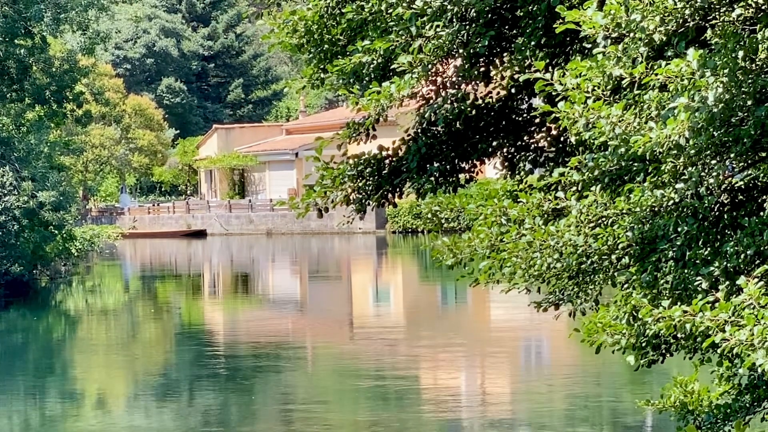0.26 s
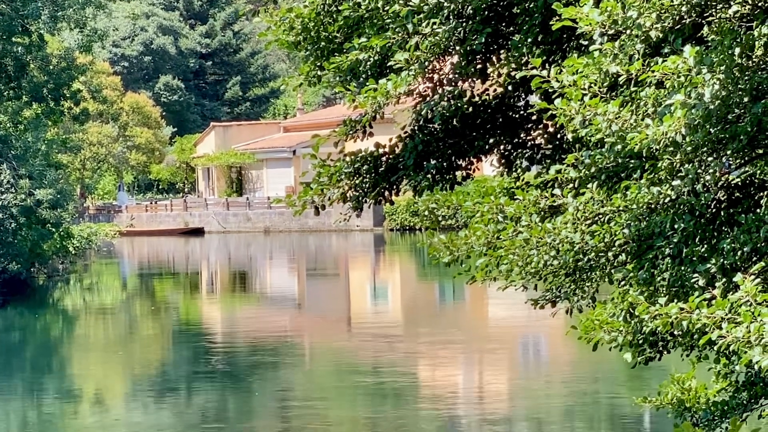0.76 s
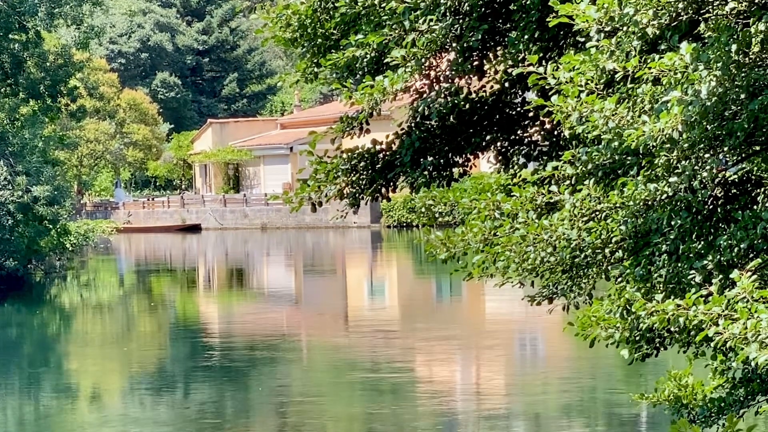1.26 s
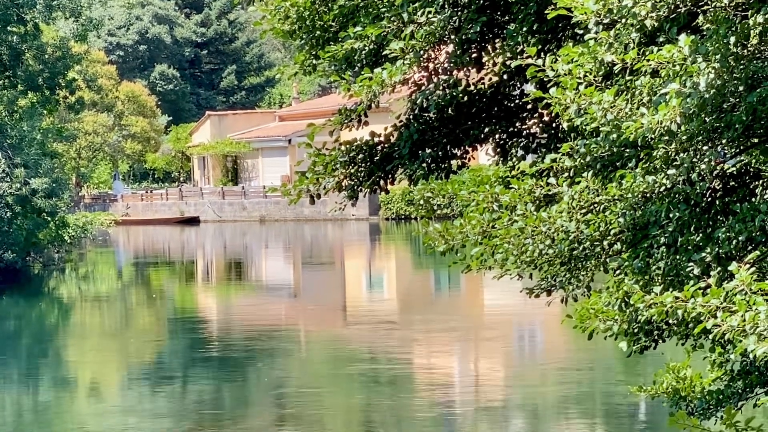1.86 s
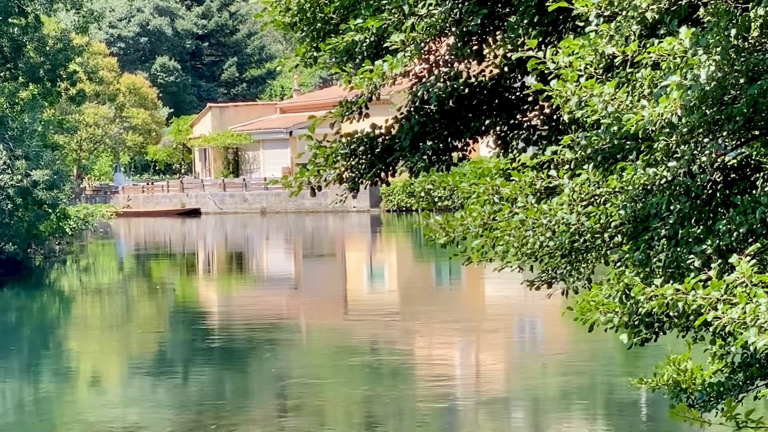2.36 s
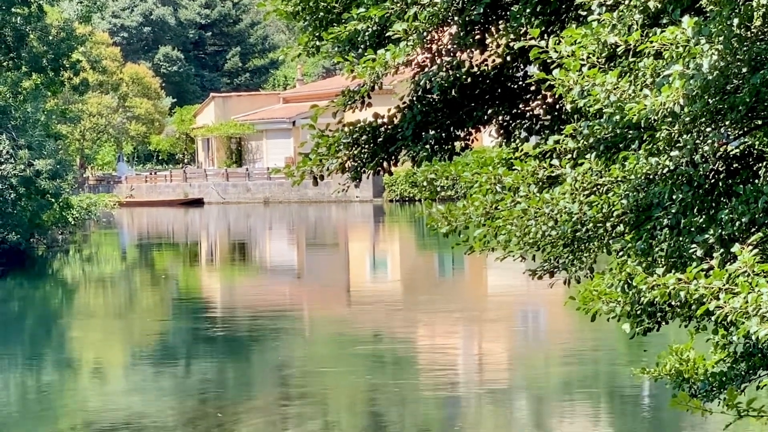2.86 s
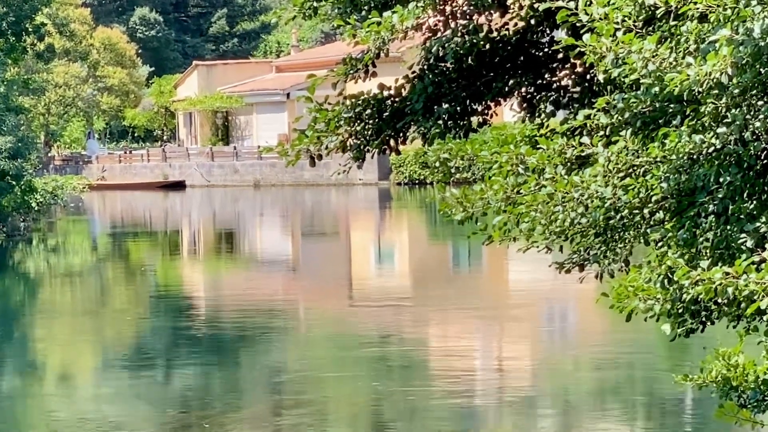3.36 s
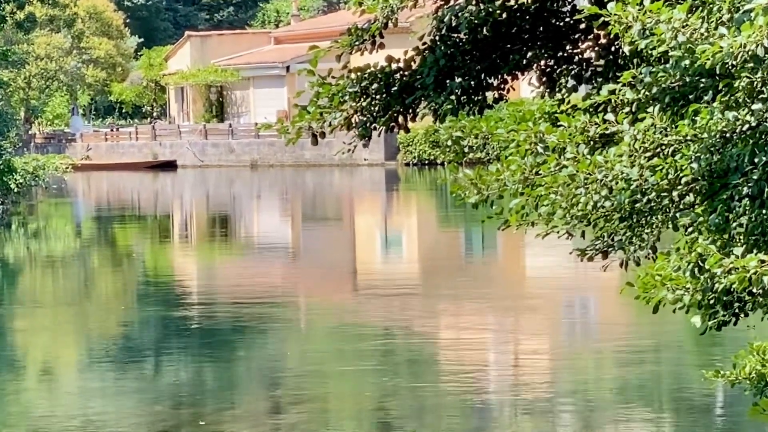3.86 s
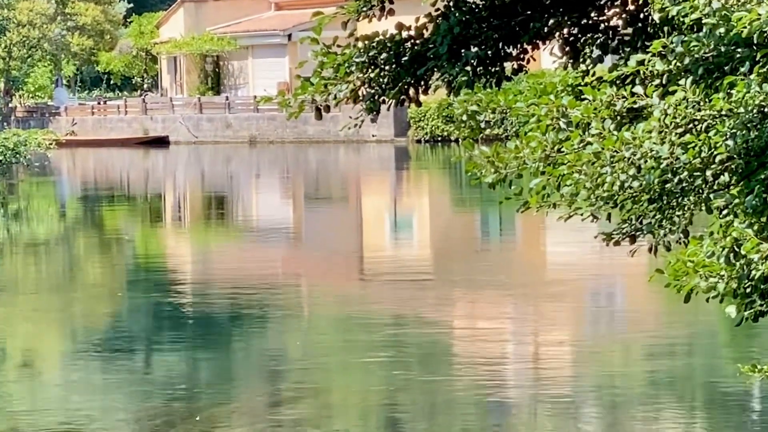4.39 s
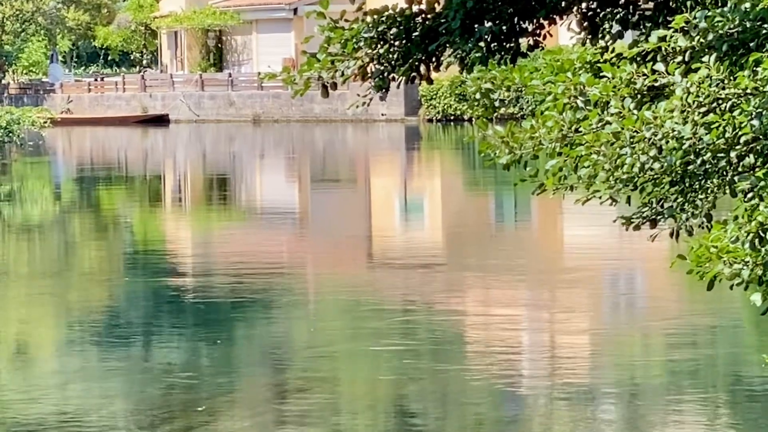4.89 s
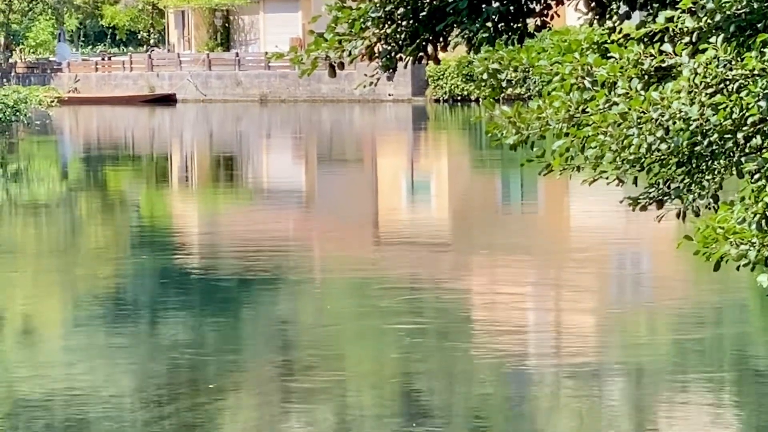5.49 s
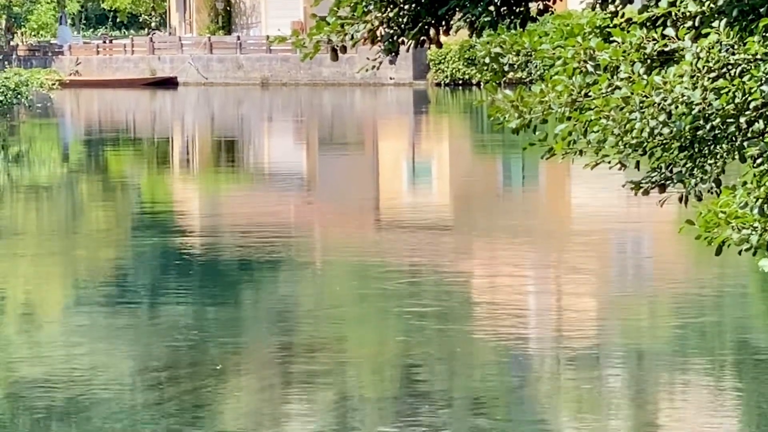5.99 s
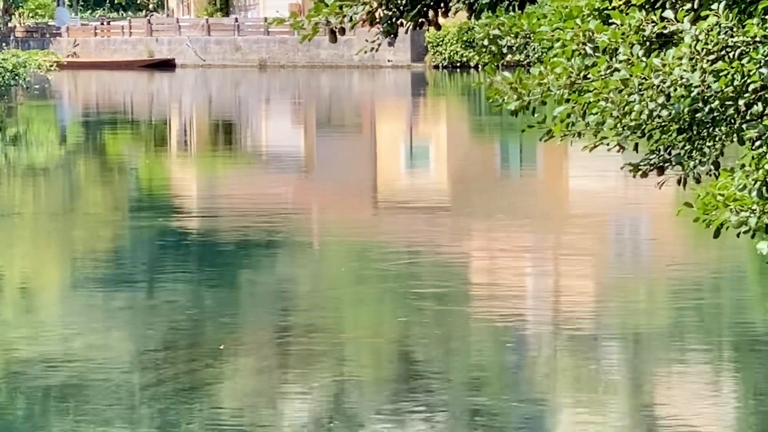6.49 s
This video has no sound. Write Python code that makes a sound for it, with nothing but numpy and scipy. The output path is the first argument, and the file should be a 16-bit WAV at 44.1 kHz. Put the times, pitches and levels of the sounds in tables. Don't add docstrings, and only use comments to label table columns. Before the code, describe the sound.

A continuous cicada chorus fills the foreground, hissy and shimmering, with several nearer singers fluttering slightly. Underneath lie a distant low engine drone, a steadier second engine, a faint idling motor and dull traffic rumble with soft thuds. Tiny bird whistles come only at the start. The main engine lifts off midway, coasts downward and brakes at the end. Faint water and leaf noise; small handheld stereo microphone outdoors.

```python
import sys
import numpy as np
from scipy import signal
from scipy.fft import rfft, irfft
from scipy.io import wavfile
from scipy.ndimage import uniform_filter1d

SR = 44100
rng = np.random.default_rng(int(sys.argv[2]) if len(sys.argv) > 2 else 0)


def generate_wav(signal):
    frames = np.transpose(np.atleast_2d(signal))
    scaled = np.clip(frames, -1, 1) * 32767
    pcm = np.round(scaled).astype(np.int16)
    wavfile.write(sys.argv[1], SR, pcm)


def amplitude_ratio(level_db):
    exponent = np.asarray(level_db, float) / 20
    return 10 ** exponent


N = 297234
T = np.arange(N) / SR


def evened(x):
    return x / np.sqrt(np.mean(x ** 2) + 1e-20)


def read(points, hz):
    f, *columns = np.transpose(points)
    return [np.interp(np.log(hz + 1), np.log(f + 1), c) for c in columns]


def follow(rows):
    s, *columns = np.transpose(rows)
    return [np.interp(T, s, c) for c in columns]


def smoothed(x, size, axis=-1):
    return uniform_filter1d(uniform_filter1d(x, size, axis), size, axis)


def wander(size):
    return evened(smoothed(rng.standard_normal(N), size))


def coloured_noise(points):
    gain = amplitude_ratio(read(points, np.fft.rfftfreq(N, 1 / SR))[0])
    return evened(irfft(rfft(rng.standard_normal((2, N))) * gain, N))


def bump(s, length_s):
    return np.exp(-0.5 * ((T - s) / length_s) ** 2)


def buckling():
    singers, slowest_per_s, fastest_per_s = 10, 380, 660
    clicks = np.zeros(N)
    for rate_per_s in rng.uniform(slowest_per_s, fastest_per_s, singers):
        uneven_rate = rate_per_s * (1 + 0.06 * wander(size=400))
        count = np.floor(np.cumsum(uneven_rate) / SR)
        clicks += np.diff(count, prepend=0) * rng.standard_normal(N)
    return 0.63 * evened(clicks) + 0.78 * rng.standard_normal(N)


# frequency in Hz, level in dB.
TYMBAL_COLOUR = [(1500, -49), (1800, -22.5), (2280, -8), (2750, -12.5), (3600, -18), (4300, -3), (4750, 1),
                 (5200, -2), (6200, -8), (7500, -9.5), (8300, -15.5), (10200, -20.5), (11200, -26),
                 (12900, -29.5)]
# throbs per s, change of that rate per s, first throb in s, depth in dB.
SINGER_THROBS = [(6.156, .198, .039, .6), (5.825, .104, .234, .6), (6.91, -.087, .13, .65),
                 (4.855, .172, .192, .4), (4.688, -.043, .173, .25), (7.536, -.03, .153, .3),
                 (6.046, .171, .198, .4), (3.639, .04, .264, .2)]


def cicadas():
    treble_db, band_over_treble_db, sag_db_per_s = -59.5, 10.5, 0.07
    treble_throb, ring_throb, lowest_ring_share = 1.09, 0.82, 0.65
    _, t, z = signal.stft([buckling(), buckling()], SR, nperseg=512, noverlap=384)
    bin_hz = np.fft.rfftfreq(512, 1 / SR)
    column_hz = bin_hz[:, None]

    beat_db = 0
    for rate, change, first_s, depth_db in SINGER_THROBS:
        since = t - first_s
        beat_db = beat_db + depth_db * np.cos(2 * np.pi * since * (rate + 0.5 * change * since))
    treble_beat_db = treble_throb * beat_db - sag_db_per_s * t
    ring_beat_db = ring_throb * beat_db - sag_db_per_s * t

    high = np.clip((column_hz - 5300) / 900, 0, 1)
    low = np.clip((4000 - column_hz) / 500, 0, 1)
    level_db = high * treble_beat_db * (1 + 0.71 * np.clip(column_hz / 8000 - 1, 0, 1))
    level_db += (1 - high) * ring_beat_db * (1 - low * (1 - lowest_ring_share))

    patches = rng.standard_normal(z.shape[1:])
    patches = uniform_filter1d(uniform_filter1d(patches, 6, 0), 16, 1)
    air_loss_db = -30 * np.clip(np.log2(bin_hz / 13000 + 1e-9), 0, 1)
    colour_db = read(TYMBAL_COLOUR, bin_hz)[0] + air_loss_db
    z *= amplitude_ratio(colour_db[:, None] + level_db + 0.81 * evened(patches))
    chorus = signal.istft(z, SR, nperseg=512, noverlap=384)[1][:, :N]
    return amplitude_ratio(treble_db + band_over_treble_db) * evened(chorus)


def orders(firing_hz, rows, rough_db):
    phase = 2 * np.pi * np.cumsum(firing_hz) / SR
    out = np.zeros(N)
    for multiple, db in rows:
        level = np.sqrt(2) * amplitude_ratio(db + rough_db * wander(size=1500))
        waver = 0.2 * wander(size=2500) + 2 * np.pi * rng.random()
        out += level * np.sin(multiple * phase + waver)
    return out


def after(s):
    return np.clip((T - s) / 0.08 + 0.5, 0, 1)


# time in seconds, level in dB.
THROTTLE = [(0, 2.5), (.4, 1.5), (.7, 1.5), (1.2, 0.5), (1.9, -7.5), (2.2, -12), (2.6, -8), (3, -16),
            (3.4, -19), (6.74, -47)]
# multiple of the firing rate, level in dB when pulling, when coasting, when braking.
LOW_ORDERS = [(2, -47, -53.5, -53), (3, -47, -42, -66), (4, -50, -54.5, -62), (5, -48.5, -58, -51)]
# time in seconds, multiple, change in dB, length in seconds.
ORDER_SWELLS = [(.54, 3, -8, 0.085), (0.983, 2, -9, 0.021), (1.05, 2, 6, 0.032), (1.35, 2, -8, 0.11),
                (2.597, 2, 8, 0.29), (2.891, 2, 9.5, 0.081), (1.9, 5, 5.5, 0.082), (3.19, 3, 3.5, 0.028),
                (3.39, 2, 11.5, 0.032), (3.39, 3, 6.5, .04), (3.519, 3, -0.5, .05), (3.716, 3, 6, 0.044),
                (3.815, 3, -7.5, 0.037), (3.92, 4, 8.5, .13), (4.14, 3, 4.5, 0.036), (4.47, 3, 3, 0.049),
                (5.1, 3, -9, 0.047), (5.1, 5, -19, 0.33), (1.549, 2, -14, .12), (3.95, 3, 6, 0.018),
                (3.13, 4, 5, .06), (3.122, 5, 6, 0.042), (4.25, 4, -16, 0.089), (6.05, 5, -5, 0.048),
                (6.698, 5, 4.5, 0.043), (6.651, 3, -3, .1), (1.25, 5, -7, 0.091), (1.75, 3, -13, 0.11),
                (4.337, 3, 0.5, 0.073)]


def low_levels():
    lift_s, brake_s = 3.07, 5.7
    throttle_share, coast_sag_db_per_s = 0.83, 2.5
    pull = amplitude_ratio(throttle_share * follow(THROTTLE)[0]) * (1 - after(lift_s))
    coast = amplitude_ratio(-coast_sag_db_per_s * (T - lift_s)) * after(lift_s)
    brake = after(brake_s)
    for multiple, pull_db, coast_db, brake_db in LOW_ORDERS:
        gain = pull * amplitude_ratio(pull_db) + coast * amplitude_ratio(coast_db) + brake * amplitude_ratio(brake_db)
        level_db = 20 * np.log10(gain)
        for s, swelling, db, length_s in ORDER_SWELLS:
            if round(swelling) == round(multiple):
                level_db += db * bump(s, length_s)
        yield multiple, level_db


# time in seconds, firing rate in Hz.
ENGINE_SPEED = [(0, 51.04), (.43, 51.96), (.9, 53.53), (1.35, 54.33), (2.14, 54.65), (2.8, 55.06),
                (3.0, 53.94), (3.5, 52.97), (4.02, 51.4), (4.34, 50.07), (4.77, 46.5), (5.11, 44.5),
                (5.41, 42.52), (6.21, 37.6), (6.74, 35.74)]
# multiple of the firing rate, level in dB.
HIGH_ORDERS = [(6, -56), (7, -53.5)]
# time in seconds, level in dB.
WHINE = [(0, -87), (.3, -70), (.42, -60.5), (.72, -63), (.8, -67.5), (1.15, -67), (1.45, -82), (1.8, -95)]


def moving_engine():
    hz = follow(ENGINE_SPEED)[0]
    low = orders(hz, low_levels(), rough_db=2.0)
    high = amplitude_ratio(follow(THROTTLE)[0]) * orders(hz, HIGH_ORDERS, rough_db=2.0)
    whine = orders(hz, [(17, follow(WHINE)[0])], rough_db=2.0)
    return low + high + whine


# time in seconds, firing rate in Hz, level in dB.
STEADY_ENGINE = [(0, 51.05, -55), (.8, 50.8, -55), (1.5, 50.96, -43), (2.3, 51.96, -48), (3.1, 50.03, -62),
                 (3.6, 50.38, -55), (4.2, 50.22, -51.5), (6.74, 49.89, -66)]
# multiple of the firing rate, level in dB.
STEADY_ORDERS = [(2, -7.5), (3, -3.5), (4, -17), (5, -11.5), (6, -15)]


def steady_engine():
    hz, db = follow(STEADY_ENGINE)
    return amplitude_ratio(db) * orders(hz, STEADY_ORDERS, rough_db=2.0)


# time in seconds, firing rate in Hz (the motor sounds at 0.96 of it), level in dB.
IDLING_MOTOR = [(0, 36.9, -57.5), (2, 38.2, -61), (3, 37.1, -73), (4.2, 38.2, -58), (5, 38, -80),
                (6.74, 35.97, -70)]


def idling_motor():
    hz, db = follow(IDLING_MOTOR)
    return orders(hz, [(0.96, db)], rough_db=3.5)


# frequency in Hz, level in dB.
ROAD_COLOUR = [(20, -34), (27, -24.5), (36, -2), (45, 0), (70, 6.5), (130, -1.5), (220, -4), (330, -18.5),
               (430, -21.5), (700, -87)]
# time in seconds, level in dB over the rumble.
WHEEL_THUDS = [(2.251, 2), (2.5, 6), (2.8, 7), (3.26, 3.5), (3.52, 3), (3.95, 7), (5.09, 4.5), (5.44, 6.5),
               (6.06, 5.5), (6.46, 3), (.25, -3), (.75, 2), (4.75, 3)]


def traffic():
    rumble_db = -53.5 + 0.88 * T
    for s, db in WHEEL_THUDS:
        rumble_db += db * bump(s, length_s=0.045)
    roar_db = -50.5 - 0.05 * T
    noise = coloured_noise(ROAD_COLOUR)
    below_130_hz = signal.butter(2, 130, fs=SR, output="sos")
    deep = signal.sosfiltfilt(below_130_hz, noise)
    return amplitude_ratio(rumble_db - 2.0) * evened(deep) + amplitude_ratio(roar_db - 2.0) * evened(noise - deep)


# frequency in Hz, level in dB.
AIR_COLOUR = [(200, -47), (300, -4), (430, -1.5), (625, -4), (850, -6.5), (1200, -10.5), (1500, -17),
              (1750, -22), (2200, -17), (4000, -77), (6000, -100)]


def river_and_leaves():
    level_db, sag_db_per_s = -57, 0.3
    return amplitude_ratio(level_db - sag_db_per_s * (T - T.mean())) * coloured_noise(AIR_COLOUR)


# start in seconds, length in seconds, start pitch in Hz, end pitch in Hz, level in dB.
BIRD_NOTES = [
    (0.16, .045, 3520, 3350, -71),
    (0.368, .035, 3060, 3040, -69),
    (0.409, 0.032, 3050, 3010, -70),
    (.485, .035, 2900, 2830, -74),
    (.66, .04, 2920, 2860, -74),
    (.75, .07, 3450, 3020, -70),
    (1.094, .05, 3080, 3010, -70),
    (1.14, .055, 3000, 3060, -68),
    (1.2, 0.04, 3020, 2960, -69),
    (1.32, 0.09, 3440, 3440, -72),
]


def bird():
    out = np.zeros(N)
    warble = 1 + 0.004 * wander(size=120)
    for s, length_s, start_hz, end_hz, db in BIRD_NOTES:
        u = np.clip((T - s) / length_s, 0, 1)
        hz = (end_hz + (start_hz - end_hz) * (1 - u) ** 2.07) * warble
        swell = abs(np.sin(np.pi * u)) ** 0.46
        out += amplitude_ratio(db + 9.5) * swell * np.sin(2 * np.pi * np.cumsum(hz) / SR)
    decay_60db_s = 0.091
    echoes = rng.standard_normal(3000) * amplitude_ratio(-60 * np.arange(3000) / SR / decay_60db_s)
    return out + 0.38 * signal.oaconvolve(out, echoes / np.linalg.norm(echoes))[:N]


def scene():
    diffuse = cicadas() + traffic() + river_and_leaves()
    points = moving_engine() + steady_engine() + idling_motor() + bird()
    return diffuse + np.array([[1], [0]]) * points


# low edge in Hz, high edge in Hz, wander of the edges in Hz.
MONO_BANDS = [(2800, 4150, 110), (6170, 6330, 30), (10950, 22000, 220)]


def narrowed(ports):
    mid, side = (ports[0] + ports[1]) / 2, (ports[0] - ports[1]) / 2
    hz, t, z = signal.stft(side, SR, nperseg=2048)
    column_hz = hz[:, None]
    keep = np.ones(z.shape)
    for low_hz, high_hz, edge_hz in MONO_BANDS:
        low, high = edge_hz * rng.standard_normal((2, len(t)))
        keep[(column_hz > low_hz + low) & (column_hz < high_hz + high)] = 0
    side = signal.istft(z * keep, SR, nperseg=2048)[1][:N]
    return np.array([mid + side, mid - side])


def band_limit(x):
    return signal.sosfilt(signal.butter(12, 15140, fs=SR, output="sos"), x)


# frequency in Hz, likeness from 0 to 1, left over right in dB.
PORT_PAIR = [(100, .995, 1), (400, .99, -.3), (600, .75, 1.5), (850, .25, 3), (1250, .05, -4),
             (1600, .45, 1), (2200, .65, 3.5), (2700, .9, .5), (4100, .97, 0), (5300, .92, 0),
             (5800, .95, 0), (6500, .85, 0), (7700, .83, 0), (10900, .55, 0)]
# frequency in Hz, phase in radians.
PORT_PHASE = [(300, .22), (700, 0), (2000, -.45), (2600, .1), (4100, .3), (5000, .8), (5560, 1.15),
              (5850, 4.3), (6200, 6.25), (6600, 7.1), (8300, 8.6), (9200, 7.9), (10300, 7.5), (11100, 7)]


def record(dry):
    hz = np.fft.rfftfreq(N, 1 / SR)
    shared, other = rfft(dry)
    same, balance_db = read(PORT_PAIR, hz)
    same = np.clip(same, 0, 1)
    half = amplitude_ratio(balance_db / 2) * np.exp(-0.5j * read(PORT_PHASE, hz)[0])
    left = shared * half
    right = (same * shared + np.sqrt(1 - same ** 2) * other) / half
    mix = narrowed(irfft([left, right], N))
    return band_limit(mix)


dry = scene()
out = record(dry)
generate_wav(out)
```